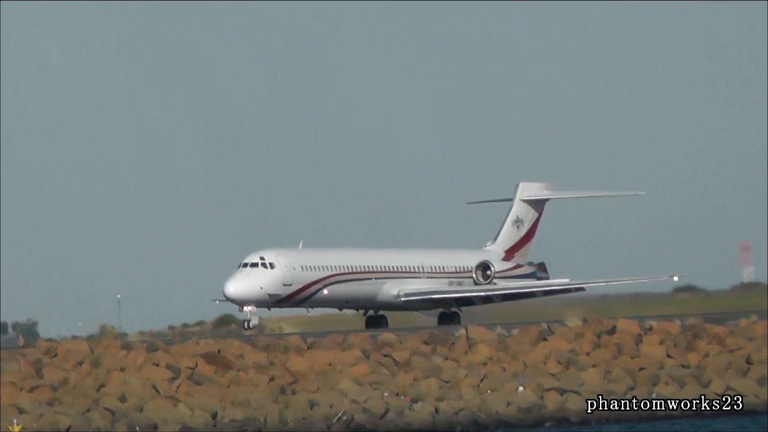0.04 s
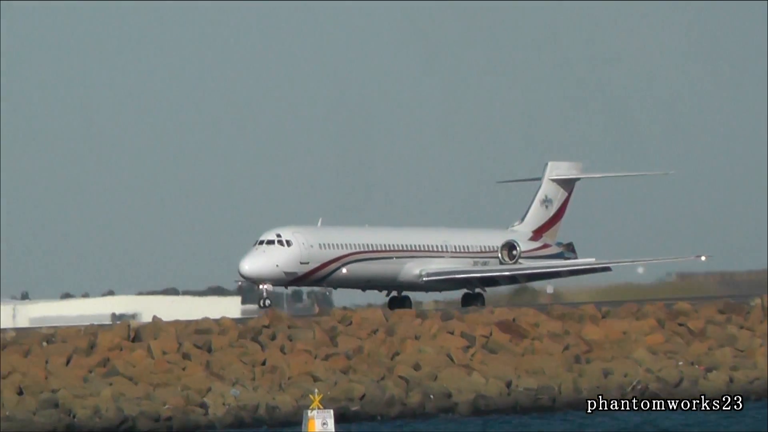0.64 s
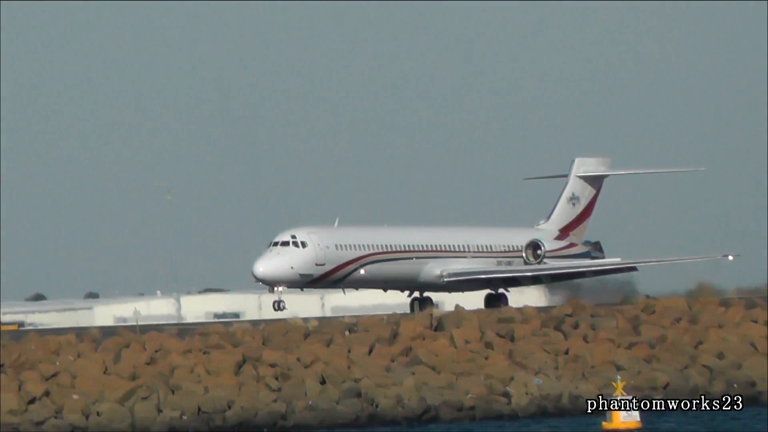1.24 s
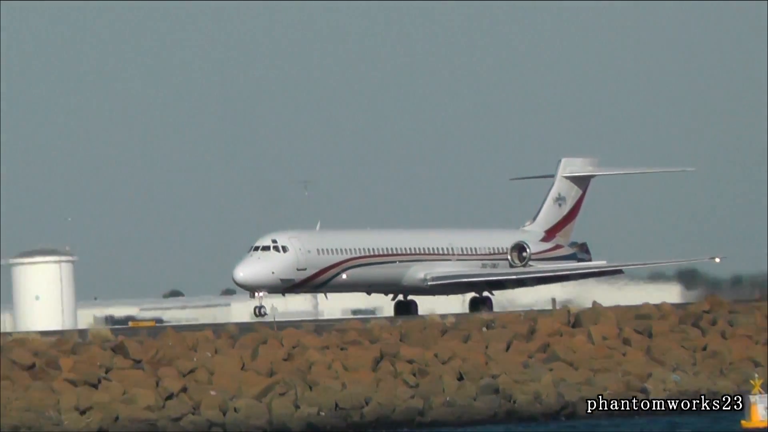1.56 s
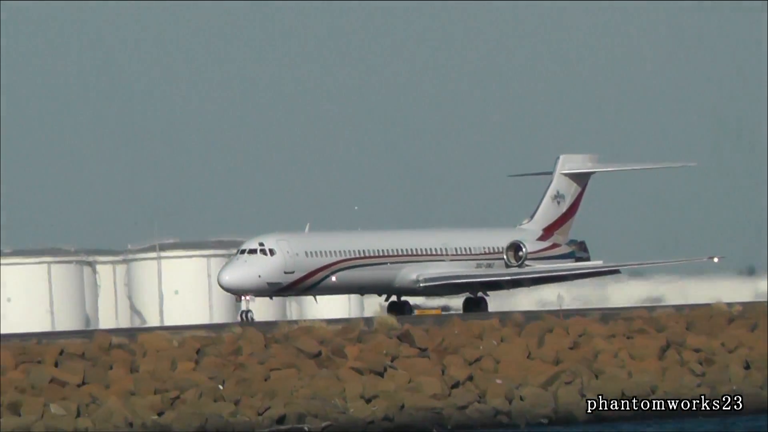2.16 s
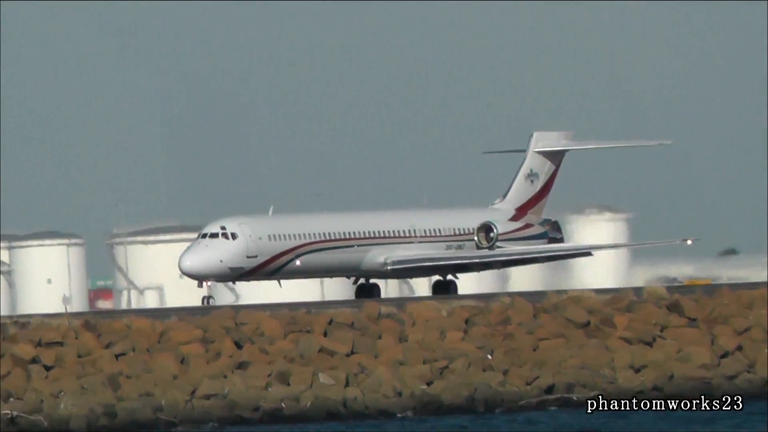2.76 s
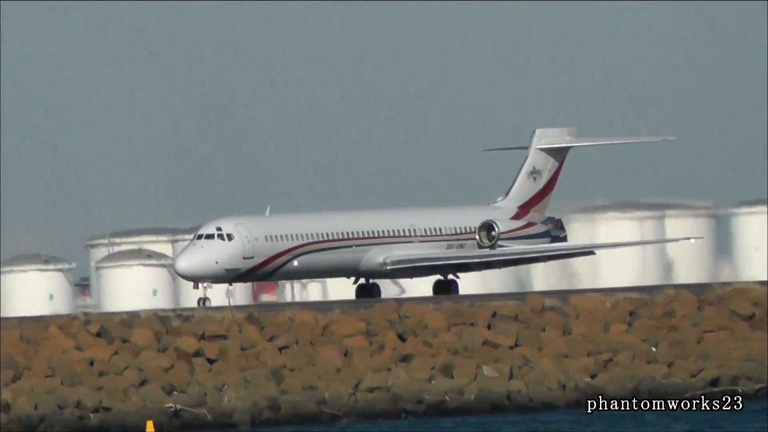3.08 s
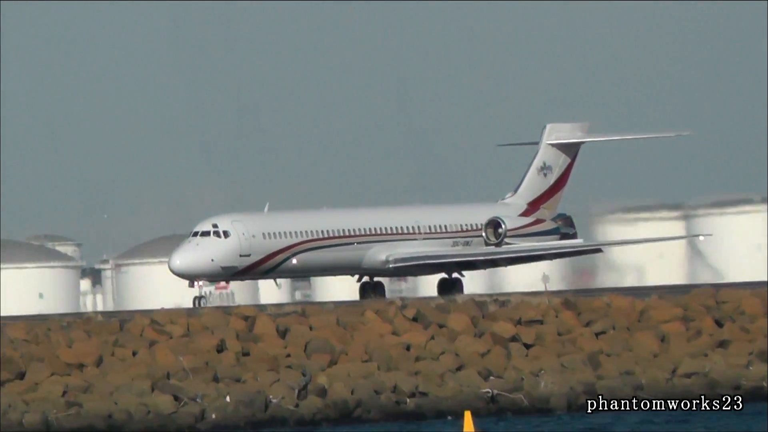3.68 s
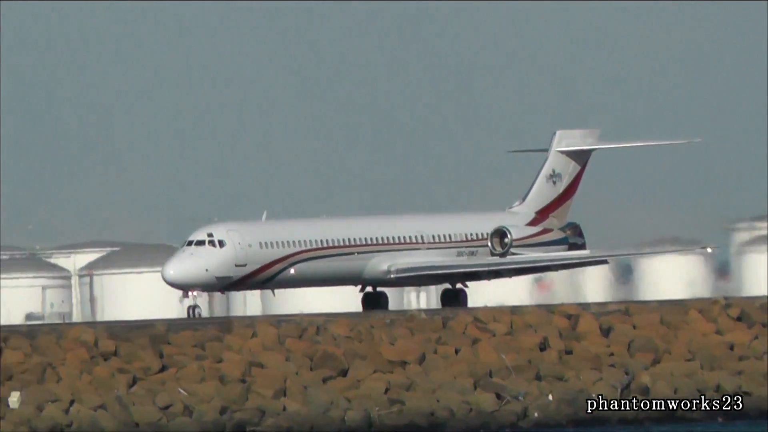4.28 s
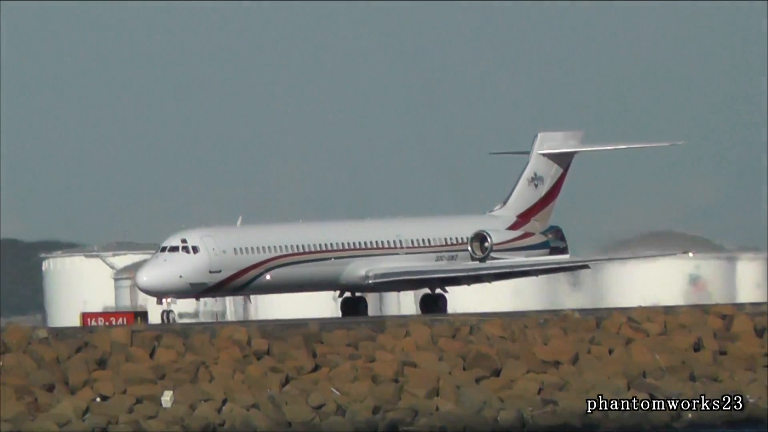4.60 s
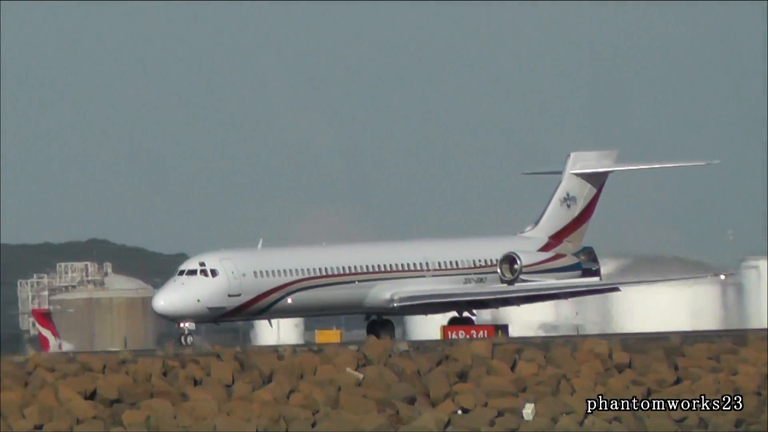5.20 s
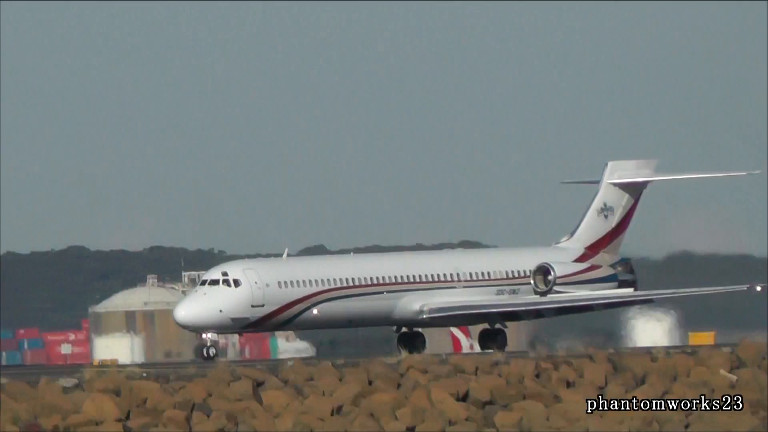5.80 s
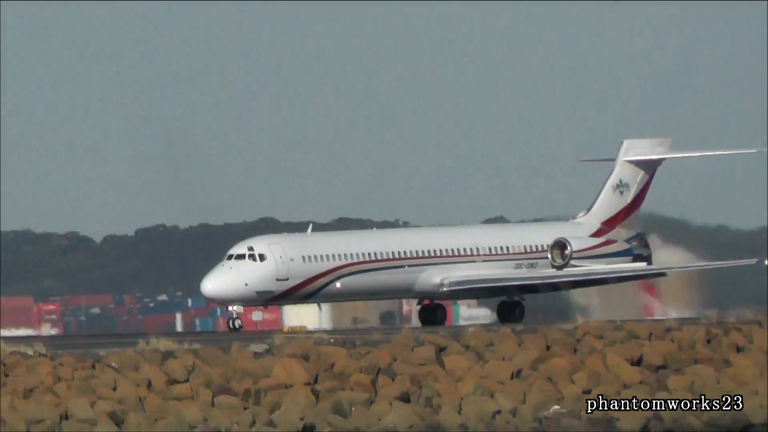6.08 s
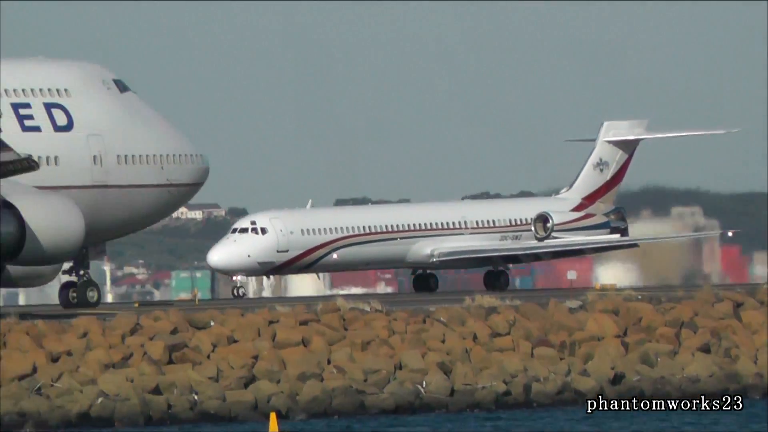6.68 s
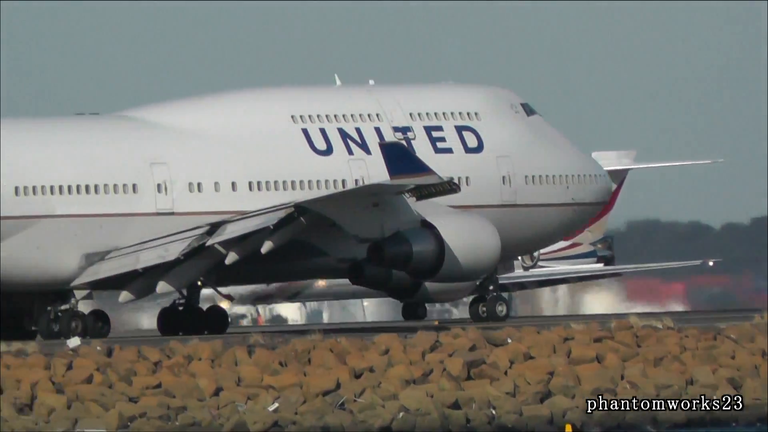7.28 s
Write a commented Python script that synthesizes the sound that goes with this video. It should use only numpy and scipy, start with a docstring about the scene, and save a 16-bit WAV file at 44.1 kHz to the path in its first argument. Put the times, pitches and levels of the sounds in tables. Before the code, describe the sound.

Outdoors, across water from a runway, a slowing jet roars and hisses, swinging left and then drifting toward the centre. The roar dies down into an idling rumble with a hum that swells and sinks over rushing tyre and air noise. Close by are a faint low wind, scattered dry ticks and, past the middle, a single sharp click. A second, bigger jet adds a low rumble at the end.

```python
"""The roar and hiss of a jet in reverse thrust carry across water as it rolls out after landing.
Turbulent exhaust makes the roar, the fans the hiss and hum. The engines spool down, the reversers
close, and the rumble and swelling hum of idle remain, with the rush of air and tyres.
Near the end a larger jet taxis past as a deep rumble. Close by are a light wind, small dry ticks
and one sharp click."""
import sys
import numpy as np
from scipy import signal
from scipy.io import wavfile
from scipy.ndimage import uniform_filter1d

SR = 44100
rng = np.random.default_rng(int(sys.argv[2]) if len(sys.argv) > 2 else 0)


def unload_audio(sound):
    """Save the sound as a 16-bit wav file, at the path given as the first command line argument."""
    columns = np.transpose(np.atleast_2d(sound))
    # keep every value between -1 and 1, then stretch to whole-number steps
    steps = np.round(np.clip(columns, -1, 1) * 32767)
    wavfile.write(sys.argv[1], SR, steps.astype(np.int16))


N = 328545
FRAME, HOP = 2048, 512
HZ = np.fft.rfftfreq(FRAME, 1 / SR)
TIMES = np.arange(N // HOP + 3)[:, None] * HOP / SR  # seconds, one row a frame
ABEAM_S, STOW_S = 1.9, 3.48  # the aircraft comes abeam; its reversers close

# The two microphone ports with the source fully left. Each row: frequency in Hz, diffuse sound
# relative to direct in dB, left minus right level in dB, phase lead of the left port in radians.
PORTS = [(110, -34, 0, 0), (270, -35.5, -0.4, 0.09), (420, -21, 0, 0.19), (600, -16, -1.2, 0.26),
         (820, -15, 1, 0.45), (1100, -8.5, 2, 0.91), (1650, -8.5, 5.5, 0.19), (2200, -8, 2.5, .15),
         (3000, -7.5, 8, 0), (4300, -16.5, 3, -.05), (6000, -17.5, 3.5, .1), (8000, -1, 9, .1),
         (10000, 4, 0, 0)]


def from_db(db):
    """Amplitude grows tenfold for every 20 decibels."""
    return 10 ** (np.asarray(db) / 20)

def unit(x):
    """Normalisation to an rms of one."""
    return x / np.sqrt(np.mean(np.abs(x) ** 2) + 1e-30)

def over_hz(table, hz=HZ, column=1):
    """Interpolation of one table column on a logarithmic frequency axis."""
    columns = np.transpose(table)
    return np.interp(np.log(hz + 1), np.log(columns[0] + 1), columns[column])

def since(s):
    """Seconds elapsed since a moment, zero before it; one value a frame."""
    return np.maximum(TIMES - s, 0)

def bell(x, centre, width):
    """A Gaussian of height one that falls to 1/e at one width from its centre."""
    return np.exp(-((x - centre) / width) ** 2)

def per_sample(values):
    """Linear interpolation from frames to samples."""
    return np.interp(np.arange(N) / SR, TIMES.ravel(), np.ravel(values) * np.ones(len(TIMES)))

def from_frames(spectra):
    """Overlap-add turns short-time spectra (channels x frames x bins) into sound."""
    return signal.istft(spectra.transpose(0, 2, 1), nperseg=FRAME, noverlap=FRAME - HOP)[1][:, :N]

def white_spectra():
    """White noise has Gaussian short-time spectra (frames x bins)."""
    return rng.standard_normal((len(TIMES), 2 * len(HZ)), dtype=np.float32).view(np.complex64)

def noise(colour, level_db, diffuse_db):
    """Partly coherent stereo noise: the ports share a direct part and take a diffuse part in antiphase."""
    direct = white_spectra()
    diffuse = white_spectra() * np.float32(from_db(diffuse_db))
    stereo = from_frames(np.array([direct + diffuse, direct - diffuse]) * np.float32(colour))
    return unit(stereo) * from_db(per_sample(level_db))

def shaped_noise(gain):
    """Random phases turn a magnitude spectrum into complex noise of rms one."""
    phase = np.exp(2j * np.pi * rng.random(len(gain)))
    return unit(np.fft.ifft(gain * phase, N))

def crack(centre_hz, width_hz, decay_ms=1.1, snap=0, size=4096):
    """A band-limited noise burst decays exponentially; snap weights an impulse at its onset."""
    band = np.clip([centre_hz - width_hz / 2, centre_hz + width_hz / 2], 100, SR / 2 - 100)
    burst = rng.standard_normal(size) * np.exp(-np.arange(size) / SR * 1000 / decay_ms)
    burst[0] += snap * np.linalg.norm(burst)
    return unit(signal.sosfilt(signal.butter(4, band, "band", fs=SR, output="sos"), burst))

def add(mix, s, peak_db, pan_db, sound):
    """Superposition of a short sound on the mix, placed by its left minus right level."""
    part = mix[:, round(s * SR):][:, :len(sound)]
    gains = from_db([[peak_db + pan_db / 2], [peak_db - pan_db / 2]])
    part += gains * sound[:part.shape[1]] / np.abs(sound).max()

def microphone_hiss():
    """Self-noise sets a quiet, steady floor."""
    # Each row: frequency in Hz, relative spectral level in dB, part unlike in the two ports in dB.
    floor = [(2000, 5.5, -15), (3900, 6, -17.5), (4700, 4.5, -19), (5100, 11, -17), (5330, 15.5, -16),
             (5650, 8.5, -25.5), (5950, 9.5, -17), (6150, 15.5, -10.5), (6400, 7.5, -9), (6800, 7, -4),
             (7600, 4, -1), (10000, 1.5, -11.5), (14000, -2, -13.5), (15500, -8.5, -2.5)]
    return noise(from_db(over_hz(floor)), level_db=-65.0, diffuse_db=over_hz(floor, column=2))

def light_wind():
    """Eddies at each port make low-frequency pressure fluctuations."""
    # Each row: frequency in Hz, relative spectral level in dB.
    spectrum = [(20, -18.5), (42, -8), (70, 9.5), (130, -2.5), (400, -48.5)]
    return noise(from_db(over_hz(spectrum)), level_db=-55.0, diffuse_db=-5.5)

def faint_ticks(peak_db=-55, spread_db=3, low_hz=4500, high_hz=8000, count=30):
    """Faint transients fall independently, uniform in time, pitch and side."""
    out = np.zeros((2, N))
    for when, strength, pitch, side in rng.random((count, 4)):
        sound = crack(low_hz + pitch * (high_hz - low_hz), width_hz=2500)
        add(out, when * (N - 1) / SR, peak_db + spread_db * (2 * strength - 1), 10 * (side - .5), sound)
    return out

def dry_ticks():
    """Brief broadband transients are heard as ticks with little pitch."""
    # Each row: start in seconds, peak in dB, centre in Hz, bandwidth in Hz, left minus right in dB.
    ticks = [(1.119, -29, 4470, 2100, 5), (1.4315, -34, 4500, 1500, 2), (1.4347, -35, 5500, 3000, 2),
             (1.4453, -20, 2880, 3200, 13.5), (1.4515, -35, 4000, 2400, 4), (1.4775, -37, 5700, 3200, 3),
             (1.857, -38, 5470, 2500, 6), (2.036, -48, 9000, 4500, 4), (2.151, -37, 5800, 2400, 7),
             (2.165, -49, 7800, 3000, 4), (2.482, -32, 4200, 3600, 4), (2.492, -35, 4700, 3600, 6),
             (2.502, -40, 5800, 3000, 4), (2.513, -40, 5800, 3000, 4), (2.871, -41, 4700, 3000, 4),
             (3.119, -36, 4000, 3200, 5), (3.175, -35, 3700, 3000, 4), (3.188, -41, 4800, 3000, 3),
             (3.387, -34.5, 3500, 2200, 3), (3.4412, -41.5, 5700, 2400, -1), (3.8915, -47, 6000, 3000, 1),
             (4.177, -50, 6460, 2600, 0), (4.632, -45, 5800, 2400, 0), (6.1644, -34, 5300, 1800, 2),
             (6.1855, -48, 5700, 1600, 2), (6.9667, -51, 7400, 1400, 0), (7.311, -58, 7900, 1400, -5),
             (7.3536, -35, 3800, 2600, -5), (7.3565, -46, 3200, 1800, -6)]
    out = np.zeros((2, N))
    for s, db, centre_hz, width_hz, pan_db in ticks:
        add(out, s, db, pan_db, crack(centre_hz, width_hz, snap=0.99))
    return out

def high_peeps():
    """A narrow band and a longer decay give a noise burst a pitch."""
    # Each row: start in seconds, peak in dB, centre in Hz, bandwidth in Hz.
    peeps = [(5.1, -58, 6900, 600), (6.487, -59, 7950, 600), (6.52, -66, 8050, 200)]
    out = np.zeros((2, N))
    for s, db, centre_hz, width_hz in peeps:
        add(out, s, db, 0, crack(centre_hz, width_hz, decay_ms=17))
    return out

def sharp_click(start_s=4.9068, ring_db=-19, snap_db=-35, pan_db=-3, rise_ms=0.13, low_hz=2700):
    """A hard part snaps and rings in damped modes; it is too small to radiate bass."""
    # Each row: frequency in Hz, relative level in dB, time to decay by 60 dB in seconds.
    modes = [(3300, 0, 0.013), (3800, 4, 0.013), (4380, 4, 0.009), (5080, -21.5, 0.09), (5880, 7.5, 0.0065),
             (6650, 1.5, .006), (7400, 1, 0.01), (8250, 2, 0.0075), (10700, -6.5, 0.005),
             (12100, -7.5, 0.005), (13400, -12, .005), (15400, -19, .005)]
    out, t = np.zeros((2, N)), np.arange(4096) / SR
    ring = sum(from_db(db - 60 * t / t60) * np.sin(2 * np.pi * hz * t) for hz, db, t60 in modes)
    ring *= (1 - np.exp(-t * 1000 / rise_ms)) ** 2
    ring = signal.sosfilt(signal.butter(2, low_hz, "high", fs=SR, output="sos"), ring)
    add(out, start_s, ring_db, pan_db, ring)
    add(out, start_s, snap_db, pan_db, crack(centre_hz=8500, width_hz=9000, decay_ms=2.2))
    return out

def taxiing_jet(nearest_s=6.95, passing_s=0.42, nearest_db=-39):
    """Spherical spreading: the larger jet's bass, all that carries, falls inversely with distance."""
    # Each row: frequency in Hz, relative spectral level in dB.
    spectrum = [(22, -30), (42, -11), (60, 4), (88, 14.5), (120, -23), (250, -29.5), (600, -59)]
    rumble = shaped_noise(from_db(over_hz(spectrum, np.fft.rfftfreq(N, 1 / SR))))
    relative_distance = np.hypot(1, (TIMES - nearest_s) / passing_s)
    return unit(rumble.real) * from_db(nearest_db) / per_sample(relative_distance)

def shimmer(depth_db, frames, bins):
    """Scintillation: moving air on the long path lifts and drops patches of the spectrum."""
    field = rng.standard_normal((len(TIMES), len(HZ)))
    patches = uniform_filter1d(uniform_filter1d(field, frames, 0), bins, 1)
    return from_db(depth_db * unit(patches))

def swell_db(hz=HZ, width_octaves=0.19):
    """Propagation fading: bands of the drone swell and sink on their way across the water."""
    # Each row: time in seconds, half-length in seconds, height in dB, centre in Hz.
    swells = [(0.197, 0.15, 5.5, 177), (0.348, 0.16, 5, 245), (0.5, 0.1, 2, 397), (0.8, 0.55, 1.5, 510),
              (1.144, 0.036, 6, 282), (1.314, 0.065, 9, 251), (1.4, 0.28, 3.5, 170),
              (1.526, 0.11, 4.5, 276), (1.95, 0.55, -0.7, 582), (2.096, 0.055, 5, 277),
              (2.248, 0.37, 4.5, 165), (2.4, 0.71, 1.5, 405), (2.676, 0.09, 3.5, 310),
              (3.003, 0.12, 2, 288), (3.89, 0.12, 4, 266), (4.3, 0.4, 0, 570), (4.418, 0.29, 3, 286),
              (4.647, 0.11, 3.5, 693), (5.076, 0.085, -5, 543), (5.654, 0.17, 2.5, 284),
              (5.952, 0.33, 6, 200), (6.0, 0.98, 2, 371), (6.15, 0.49, 0.8, 567), (6.297, 0.11, 2.5, 288),
              (6.694, 0.08, 2, 287), (6.699, 0.5, -4, 870), (6.99, 0.11, 2.6, 282),
              (7.319, 0.14, -1.5, 288)]
    return sum(db * bell(TIMES, s, half_s) * bell(np.log2((hz + 1) / centre), 0, width_octaves)
               for s, half_s, db, centre in swells)

def arrive(sound, leftmost_s=1.08, rest_share=.1):
    """The nearer port leads in phase and level; the aircraft swings left, then drifts to the centre."""
    spectra = signal.stft(sound, nperseg=FRAME, noverlap=FRAME - HOP)[2].transpose(0, 2, 1)
    swing = TIMES[:spectra.shape[1]] / leftmost_s
    bearing = rest_share + (1 - rest_share) * swing * np.exp(1 - swing)
    pan_db = bearing * over_hz(PORTS, column=2)
    lead_radians = bearing * over_hz(PORTS, column=3)
    left = from_db(pan_db / 2) * np.exp(.5j * lead_radians)
    return from_frames(spectra * np.array([left, 1 / left]))

def power(halfway_s=1.48, steepness=3.54):
    """Spool-down: engine power falls from one at full reverse towards zero at idle."""
    return 1 / (1 + (TIMES / halfway_s) ** steepness)

def rolling_rush(abeam_db=-35, rise_db_per_s=5.5, fall_db_per_s=0.8, start_pitch=1.09, sag_per_s=0.015):
    """Air and tyre noise of a passing source grows until abeam, then fades in surges; its pitch sinks."""
    # Each row: frequency in Hz, relative spectral level in dB.
    spectrum = [(200, -28), (600, -22.5), (850, 5.5), (1050, 4.5), (1280, 3), (1520, -4), (1810, -10.5),
                (1970, -11.5), (2250, -15), (3200, -20), (4100, -28.5), (6000, -41.5), (9000, -55)]
    # Each row: time in seconds, half-length in seconds, height in dB.
    surges = [(2.9, 0.4, 1.5), (4.35, 0.14, -1), (4.72, 0.18, 1.5), (5.3, 0.25, 0.4)]
    colour_db = over_hz(spectrum, HZ / (start_pitch - sag_per_s * TIMES))
    brightening_db = 1.8 * bell(TIMES, 2.33, 0.85) * bell(HZ, 1610, 120)
    colour = from_db(colour_db + brightening_db) * shimmer(depth_db=1.2, frames=24, bins=7)
    passing_db = rise_db_per_s * np.minimum(TIMES - ABEAM_S, 0) - fall_db_per_s * since(ABEAM_S)
    surge_db = sum(db * bell(TIMES, s, half_s) for s, half_s, db in surges)
    return noise(colour, abeam_db + passing_db + surge_db, over_hz(PORTS))

def jet_fizz(full_db=-66.0, drop_db=24):
    """Jet noise at the highest frequencies needs high thrust and falls away with the power."""
    # Each row: frequency in Hz, relative spectral level in dB.
    spectrum = [(6000, -13), (8000, 1.5), (8500, -6), (9200, 1), (10500, 1), (12300, 1.5), (13300, -20),
                (15000, -19)]
    return noise(from_db(over_hz(spectrum)), full_db - drop_db * (1 - power()), diffuse_db=0)

def hiss_loss_db(hold_s=1.45, fade_db_per_s=8):
    """Exponential decay: after a hold, the intake hiss loses equal decibels each second."""
    return fade_db_per_s * since(hold_s)

def crackle(per_second=50, size_db=-22.0, spread_db=1.5, fade_share=0.75):
    """A Poisson train of band-limited impulses crackles in the hiss and fades more slowly than it."""
    sizes = from_db(spread_db * np.minimum(rng.exponential(1, N), 3)) * rng.choice([-1, 1], N)
    impulses = sizes * (rng.random(N) < per_second / SR)
    band = signal.butter(6, [1800, 6700], "band", fs=SR, output="sos")
    return signal.sosfilt(band, impulses * from_db(size_db - fade_share * per_sample(hiss_loss_db())))

def hiss_sweep_db(start_hz=5500, end_hz=3600, settle_s=1.2, width_hz=430, height_db=1.8, hollow_db=3):
    """A soft peak and the hollow below it sweep down through the hiss, like ground-reflection phasing;
    other bands briefly flare or dip."""
    # Each row: time in seconds, half-length in seconds, height in dB, centre in Hz, half-width in Hz.
    flares = [(0.1, 0.42, 4, 7800, 450), (0.33, 0.2, 4.3, 5960, 520), (0.36, 0.2, -5.5, 4280, 420),
              (0.38, 0.17, 1.5, 7350, 350), (0.82, 0.15, 5.5, 2950, 200)]
    centre_hz = end_hz + (start_hz - end_hz) * np.exp(-TIMES / settle_s)
    dip_db = hollow_db * bell(TIMES, 0, 2.0) * bell(HZ, 0.8 * centre_hz, width_hz)
    flare_db = sum(db * bell(TIMES, s, half_s) * bell(HZ, hz, width)
                   for s, half_s, db, hz, width in flares)
    return height_db * bell(HZ, centre_hz, width_hz) - dip_db + flare_db

def intake_hiss(level_db=-42.5, full_edge_hz=7300, idle_edge_hz=5950, settle_s=2.9, leak_db=-29):
    """Broadband fan noise has a steep upper edge that sinks as the engines spool down."""
    # Each row: frequency in Hz, relative spectral level in dB.
    spectrum = [(1000, -9.5), (1900, 13), (3000, 5.5), (3800, 2), (4700, 4.5), (5600, 1.5), (6400, 2),
                (8000, -7.5), (12000, -2.5), (15000, -15.5)]
    edge_hz = idle_edge_hz + (full_edge_hz - idle_edge_hz) * np.exp(-TIMES / settle_s)
    lowpass = 1 / np.sqrt(1 + (HZ / edge_hz) ** 20)
    colour = from_db(over_hz(spectrum) + hiss_sweep_db()) * np.hypot(lowpass, from_db(leak_db))
    air = shimmer(depth_db=1.3, frames=8, bins=40)
    return noise(colour * air, level_db - hiss_loss_db(), over_hz(PORTS))

def fan_tones(idle_lift_db=0.56, power_db=2.0, swell_scale=3.33, steadiness=0.54, flutter=0.3):
    """Periodic rotation gives spectral lines, louder under power, broadened and faded by the air."""
    # Each row: frequency in Hz, half-width in Hz, base level in dB.
    tones = [(116.5, 1.7, -49), (287.8, 5.5, -39.8), (577, 9, -40.5), (817, 15, -49), (1113, 5.8, -54),
             (1143, 3, -48.4), (1950, 40, -63), (3034, 14, -71)]
    hz, out = np.fft.rfftfreq(N, 1 / SR), np.zeros(N)
    for centre, width, db in tones:
        line = shaped_noise(1 / (1 + ((hz - centre) / width) ** 2))
        steady = line / (np.abs(line) + flutter) ** steadiness  # a fan wavers less than pure noise
        level_db = db + idle_lift_db + power_db * power() + swell_scale * swell_db(centre)
        out += unit(steady.real) * from_db(per_sample(level_db))
    return out

def idle_rumble(abeam_db=-25.5, recede_db_per_s=0.73, surge_db=2, surge_s=5.84, surge_half_s=1.0):
    """Turbulent mixing of slow exhaust rumbles; it recedes and loses depth, with one long surge."""
    # Each row: frequency in Hz, relative spectral level in dB.
    spectrum = [(22, -34.5), (40, -43), (62, -12.5), (100, -2), (170, 0.1), (260, -1), (350, -3.5),
                (480, -8.5), (650, -8), (860, -9), (1000, -27), (1500, -28), (3000, -40), (7000, -67.5)]
    level_db = abeam_db - recede_db_per_s * np.abs(TIMES - ABEAM_S)
    level_db += surge_db * bell(TIMES, surge_s, surge_half_s)
    tilt_db_per_octave = 0.5 * (since(STOW_S) - since(STOW_S).mean())
    thinning_db = tilt_db_per_octave * np.log2(np.clip(HZ, 100, 400) / 200)
    return noise(from_db(over_hz(spectrum) + swell_db() + thinning_db), level_db, over_hz(PORTS))

def reverse_roar(full_db=-19, idle_db=-32, stow_db_per_s=47, full_tilt=0.44, idle_tilt=-0.25):
    """Turbulent exhaust thrown forward is louder and brighter under power; it dies as reversers close."""
    # Each row: frequency in Hz, relative spectral level in dB.
    spectrum = [(22, -51), (45, -39), (90, -3), (150, -2.5), (250, -0.5), (370, -7), (520, -2.5),
                (800, -10), (950, -14), (1200, -14), (1550, -29.5), (2200, -47), (4000, -39), (8000, -69)]
    level_db = idle_db + (full_db - idle_db) * power() - stow_db_per_s * since(STOW_S)
    tilt_db_per_octave = idle_tilt + (full_tilt - idle_tilt) * power()
    tilt_db = tilt_db_per_octave * np.log2(np.clip(HZ, 200, 1600) / 200)
    return noise(from_db(over_hz(spectrum) + tilt_db + swell_db()), level_db, over_hz(PORTS))

def scene():
    """Superposition of the two distant aircraft, the wind and the small sounds nearby."""
    exhaust = reverse_roar() + jet_fizz() + idle_rumble()
    aircraft = exhaust + rolling_rush() + intake_hiss() + crackle() + fan_tones()
    background = light_wind() + taxiing_jet()
    nearby = dry_ticks() + sharp_click() + high_peeps() + faint_ticks()
    return arrive(aircraft) + background + nearby

def record(dry):
    """The microphone adds its self-noise, and a low-pass filter limits the bandwidth."""
    lowpass = signal.firwin(511, 15750, window=("kaiser", 9), fs=SR)
    return signal.oaconvolve(dry + microphone_hiss(), lowpass[None], "same")


dry = scene()
out = record(dry)
unload_audio(out)
```